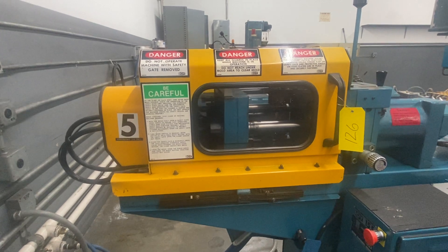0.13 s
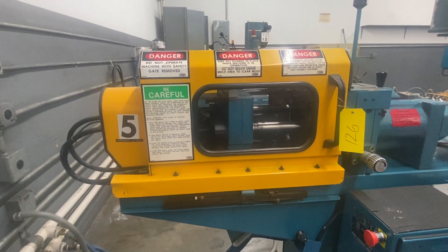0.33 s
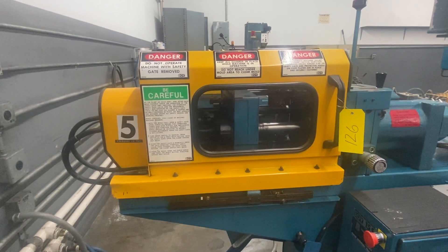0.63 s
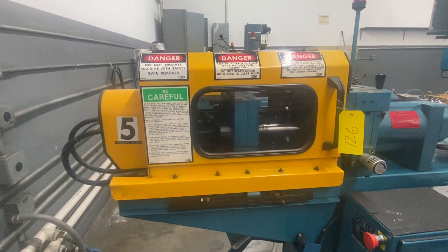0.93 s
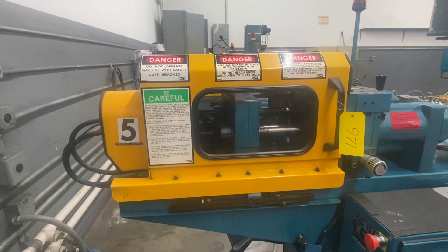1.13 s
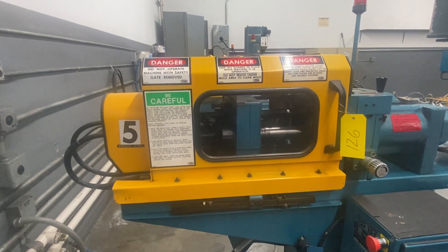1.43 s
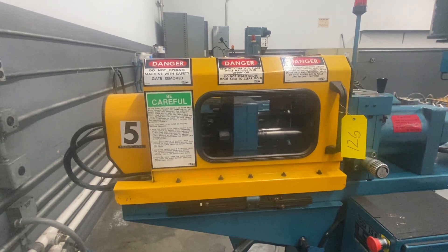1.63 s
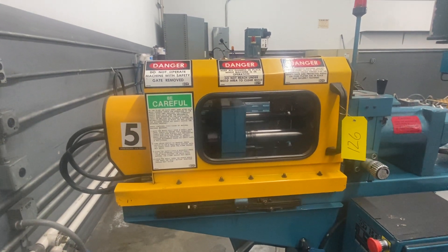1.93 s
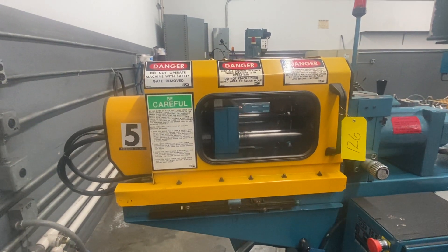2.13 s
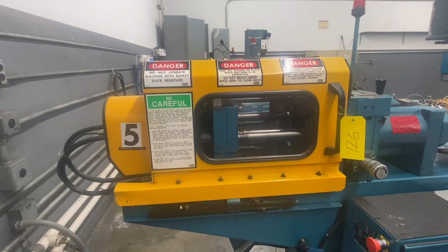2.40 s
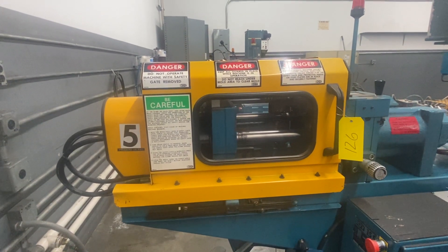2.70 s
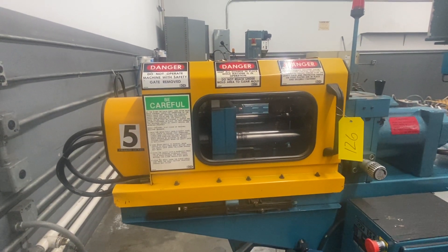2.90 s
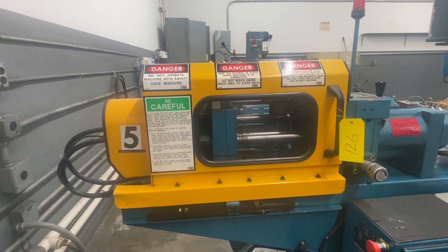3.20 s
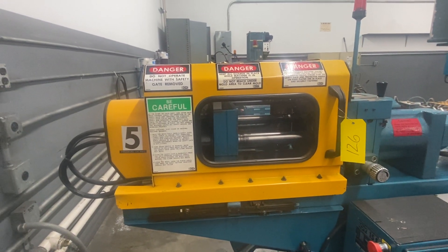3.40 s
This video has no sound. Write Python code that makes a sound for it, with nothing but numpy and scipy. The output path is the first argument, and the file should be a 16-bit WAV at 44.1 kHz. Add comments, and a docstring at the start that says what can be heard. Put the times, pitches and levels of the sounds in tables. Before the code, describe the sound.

A moulding machine's hydraulic pump whines close by in a workshop, over motor hum and rushing oil. Near 0.8 seconds a soft valve hiss and thud change the whine's tone. At 1.6 seconds a louder hiss and the hardest thuds hit the steel frame; the pump slows slightly and a thin whistle joins. At 2.2 seconds another hiss and thud end the whistle, and the pump recovers, running steadily.

```python
"""A moulding machine in a workshop, heard close up through two microphone ports. At first its
eleven-piston hydraulic pump idles, whining over motor and fan hum and a rush of oil. Valves switch three
times, each with a short hiss and thuds in the steel frame. Near 0.8 s the whine changes colour; near
1.6 s the hardest thud lands, the pump slows under load and a thin whistle joins in; near 2.2 s the
whistle stops and the pump recovers its speed."""
import sys
import numpy as np
from scipy import signal
from scipy.fft import rfft, irfft, next_fast_len
from scipy.io import wavfile
from scipy.ndimage import uniform_filter1d

SR = 44100
rng = np.random.default_rng(int(sys.argv[2]) if len(sys.argv) > 2 else 0)


def output_pcm(signal):
    """Save a mono or channel-first signal as 16-bit PCM at the path in sys.argv[1].

    Samples are clipped to [-1, 1] before scaling.
    """
    pcm = np.clip(np.atleast_2d(signal).T, -1, 1) * 32767
    wavfile.write(sys.argv[1], SR, np.round(pcm).astype(np.int16))


N = 156555
STEP = 128  # samples between values of a slow control curve
TIME = np.arange(N) / SR
CONTROL_TIME = TIME[::STEP]


def amp(db):
    return 10 ** (np.asarray(db) / 20)


def unit_rms(x):
    return x / np.sqrt(np.mean(x ** 2) + 1e-20)


def curve(points, x):
    return np.interp(x, *np.transpose(points))


def log_curve(points, hz):
    point_hz, value = np.transpose(points)
    return np.interp(np.log(hz + 1), np.log(point_hz + 1), value)


def per_sample(control):
    return np.interp(TIME, CONTROL_TIME, control)


def wander(top_hz, count):
    """Random control curves of rms 1, each a sum of slow sines up to about top_hz."""
    hz = np.geomspace(.3, top_hz, 24)[:, None]
    chance = rng.random((count, 24, 2))
    detune = .8 + .409 * chance[..., 1:]
    waves = np.sin(2 * np.pi * (hz * detune * CONTROL_TIME + chance[..., :1])) / hz ** .1
    return np.array([unit_rms(row) for row in waves.sum(1)])


def tone(angle, left_rms, right_rms, lead):
    """One tone at both ports, the left ahead by lead radians."""
    lead = per_sample(np.broadcast_to(lead, CONTROL_TIME.shape))
    left = per_sample(left_rms) * np.cos(angle + lead)
    right = per_sample(right_rms) * np.cos(angle)
    return np.sqrt(2) * np.array([left, right])


# How alike the two ports sound. Each row: frequency in Hz, likeness from 0 to 1.
PORT_LIKENESS = [(40, 1), (110, 0.79), (200, 0.97), (280, 0.35), (450, 0.083), (1500, 0.29), (3000, 0.05),
                 (6000, 0.16), (10200, 0.13), (11000, 0.75), (15500, 0.8)]
# Phase between the ports. Each row: frequency in Hz, left lead in radians.
PORT_LEAD = [(0, 0), (300, -.3), (1100, -2.6), (1800, -3), (3000, -4.7), (4000, -6.7), (5700, -9.4),
             (6700, -12.6), (9000, -15.5), (11600, -18.85), (12900, -22), (13700, -22), (14900, -25.13),
             (16000, -25.13)]
# Balance of noise at the microphone. Each row: frequency in Hz, left over right in dB.
PORT_BALANCE = [(60, 5), (150, -1), (400, .5), (1500, 1.5), (3000, 7), (5500, 2), (7700, -0.5), (9300, -14),
                (11000, -0.5), (15000, 0)]

def port_noise(spectrum, patchy_db, flicker_db):
    """Coloured noise of rms 1 at both ports, with drifting patches and flickering bands."""
    frames, hz = N // 256 + 5, np.fft.rfftfreq(1024, 1 / SR)
    a, b, c, d, chance = rng.standard_normal((frames, 513, 5)).T
    right, unshared = a + 1j * b, c + 1j * d
    flicker = unit_rms(uniform_filter1d(chance, 200, 0))
    patches = unit_rms(uniform_filter1d(uniform_filter1d(chance, 12, 0), 12, 1))
    likeness = np.clip(log_curve(PORT_LIKENESS, hz), 0, 1)[:, None]
    left = likeness * right + np.sqrt(1 - likeness ** 2) * unshared
    left *= np.exp(1j * curve(PORT_LEAD, hz))[:, None]
    lean = amp(log_curve(PORT_BALANCE, hz) / 2)[:, None]
    octaves_below = np.log2(np.maximum(spectrum[0][0] / (hz + 1), 1))
    colour_db = log_curve(spectrum, hz) - 30 * octaves_below
    gain = amp(colour_db[:, None] + patchy_db * patches + flicker_db * flicker)
    ports = np.array([left * lean, right / lean]) * gain
    return unit_rms(signal.istft(ports, nperseg=1024, noverlap=768)[1][:, :N])


# The rush around the machine. Each row: frequency in Hz, relative density in dB.
ROAR_SPECTRUM = [(42, 0), (56, -4), (90, -8.5), (200, -4), (420, -7.5), (750, -8), (1500, -10.5),
                 (3000, -21), (4800, -25), (6800, -18.5), (9500, -26.5), (12000, -33), (15500, -31)]
# Its swell under load. Each row: time in seconds, level change in dB.
ROAR_SWELL = [(0, 0), (.75, 0.5), (1, -0.5), (1.6, 1.5), (1.9, 3), (2.15, 2.5), (2.45, 1.5), (3, -0.5),
              (3.55, 0)]

def roar():
    """Broad rush of oil, fans and workshop, behind everything else."""
    level = amp(-33 + curve(ROAR_SWELL, TIME))
    return level * port_noise(ROAR_SPECTRUM, patchy_db=1.25, flicker_db=1)


# Motors and fans at the microphone. Each row: frequency in Hz, level in dB, wavering in dB,
# left over right in dB, left lead in radians.
HUM_TONES = [(80.2, -41.5, 3, -3.5, 0.078), (122.2, -46.5, 2.5, -1, 0.32), (162.7, -45, 1, -2, 0.55),
             (239.2, -53.5, 3.5, 2, 0.46), (358.3, -51, -3, -18.5, 0.17), (538, -39.5, 0.5, 7.5, 0.27),
             (568.4, -58.5, -9.5, -7, .6), (820, -56, 5, 15, 4.5), (884, -47.5, 4, 2, 1.9),
             (2692, -69, 9, -3, .5)]

def hums():
    """Steady tones of motors and fans, each wavering a little in level and phase."""
    count, out = len(HUM_TONES), np.zeros((2, N))
    phases = 2 * np.pi * rng.random(count)
    wavers, drifts = wander(12, count), wander(8, count)
    for (hz, db, waver_db, lean_db, lead), waver, drift, phase in zip(HUM_TONES, wavers, drifts, phases):
        angle = 2 * np.pi * hz * TIME + phase + per_sample(.098 * waver_db * drift)
        level_db = db + waver_db * waver
        out += tone(angle, amp(level_db + lean_db / 2), amp(level_db - lean_db / 2), lead)
    return out


def load_whistle(hz=2158, db=-45.5, start_s=1.72, end_s=2.22):
    """A thin, wavering tone, timed to the stretch where the pump is loaded."""
    fade = np.clip(np.minimum(CONTROL_TIME - start_s, end_s - CONTROL_TIME) / .019, 0, 1)
    level = amp(db + 3.7 * wander(16, count=1)[0]) * fade
    return tone(2 * np.pi * hz * TIME, level, level, lead=1.1)


# The valves, close by. Each row: start, rise, hold and 60 dB decay time in seconds, level in dB.
VALVE_HISSES = [(0.776, 0.02, .05, 0.94, -41), (1.62, .002, .01, .08, -30),
                (1.635, 0.024, 0.084, 0.43, -29), (1.775, 0.0092, 0.11, 1.1, -40.5),
                (2.196, .003, 0.006, 0.095, -29), (2.199, 0.0091, 0.015, 1.3, -31.5)]
# The colour they share. Each row: frequency in Hz, relative density in dB.
HISS_SPECTRUM = [(1600, 0), (3000, -2.5), (4000, -3), (6500, 3), (8500, -3.5), (11000, -4), (13000, -8.5),
                 (15500, -9)]

def valve_hisses():
    """Air and oil rush through a valve: rise, hold, release."""
    power = np.zeros(N)
    for start, rise, hold, t60, db in VALVE_HISSES:
        opening = np.clip((TIME - start) / rise, 0, 1)
        released_s = np.maximum(TIME - start - rise - hold, 0)
        power += (opening * amp(db - 60 * released_s / t60)) ** 2
    return np.sqrt(power) * port_noise(HISS_SPECTRUM, patchy_db=2.5, flicker_db=.68)


def workshop_room(sound, tail_db=-6, t60=.6):
    """A sound reaches the ports apart in phase, with the room's tail following 6 ms behind."""
    t, size = TIME[:SR // 2], len(sound)
    hz = np.fft.rfftfreq(size, 1 / SR)
    tails = rng.standard_normal((2, len(t))) * amp(-60 * t / t60) * (t > .006)
    right_tail, unshared = rfft(tails / np.linalg.norm(tails[0]), size) * amp(tail_db)
    likeness = np.clip(log_curve(PORT_LIKENESS, hz), 0, 1)
    left_tail = likeness * right_tail + np.sqrt(1 - likeness ** 2) * unshared
    lead = np.exp(1j * curve(PORT_LEAD, hz))
    paths = np.array([lead * (1 + left_tail), 1 + right_tail])
    return irfft(rfft(sound) * paths, size)[:, :N]


# Shocks in the frame. Each row: start in seconds, gain in dB, pitch factor, tilt in dB per octave.
SHOCKS = [(.74, -33, 1.1, -2), (1.650, -19, 1.0, 0), (1.684, -26, .8, -3), (1.706, -25, .95, -1),
          (1.745, -29, 1.1, -1), (2.203, -32, 1.0, 3), (2.262, -29, .8, -2)]
# The frame's modes. Each row: frequency in Hz, relative level in dB, 60 dB decay time in seconds.
FRAME_MODES = [(62, -9, .35), (110, -6, .3), (160, -3, .3), (240, -6, .18), (340, 2, .1), (430, -2, .09),
               (530, -2, .08), (640, -1, .08), (800, -6, .07), (960, -7, .07), (1200, -11, .05),
               (1500, -9, .05), (1800, -11, .045), (2200, -13, .04)]

def frame_thuds(rise_s=.005, clatter_share=.4, clatter_s=.012):
    """Pressure shocks, each with loose after-blows, set the steel frame ringing into the room."""
    t, frame = TIME[:SR // 2], np.zeros(next_fast_len(N + SR, True))
    clatter_decay = np.exp(-t / clatter_s)
    for start, db, pitch, tilt_db in SHOCKS:
        blow = clatter_share * rng.standard_normal(len(t)) * clatter_decay / np.linalg.norm(clatter_decay)
        blow[0] = 1  # the shock itself
        ring = np.zeros(len(t))
        for hz, mode_db, t60 in FRAME_MODES:
            level = amp(mode_db + tilt_db * np.log2(hz / 340) - 60 * t / t60)
            ring += level * np.sin(2 * np.pi * (hz * pitch * t + rng.random()))
        ring *= np.minimum(t / rise_s, 1)
        frame[round(start * SR):][:len(t)] += amp(db) * signal.fftconvolve(blow, ring)[:len(t)]
    return workshop_room(frame)


# The work cycle. Each row: time in seconds, stage from 0 (idling) to 3 (recovered), unsteadiness 0 to 1.
PUMP_CYCLE = [(0, 0, .2), (.78, 0, .2), (.82, .6, .4), (1.0, 1, .2), (1.64, 1, .2), (1.67, 1.7, 1),
              (1.8, 1.8, .7), (1.92, 1.9, .7), (1.97, 2, .2), (2.2, 2, .2), (2.23, 2.4, 1),
              (2.36, 2.6, .65), (2.48, 2.75, .4), (2.57, 3, .2), (3.55, 3, .2)]
# The pump's pace, sagging under load. Each row: time in seconds, piston strokes per second.
STROKE_RATE = [(0, 326.6), (.76, 326.6), (.9, 327.25), (1.64, 327.3), (1.69, 317.5), (1.8, 323),
               (1.88, 320), (1.96, 321.3), (2.2, 321.1), (2.29, 329.5), (2.34, 326), (2.41, 328),
               (2.47, 327.1), (3.55, 327.3)]
# The whine close up, a table for each port. Each row: one harmonic's level in dB at stages 0 to 3.
WHINE_LEFT_DB = [(-30.5, -34, -36.5, -31.5), (-41.5, -48, -30, -55.5), (-29, -37, -40.5, -39),
                 (-52, -39.5, -41, -43), (-42.5, -53, -54, -42), (-41.5, -44.5, -38.5, -44.5),
                 (-46.5, -49.5, -38, -52), (-47.5, -56, -59, -53), (-43, -45.5, -38.5, -43),
                 (-60, -54, -52, -76), (-67, -58, -60, -56), (-66, -48, -50, -51.5), (-50, -57, -56, -45.5),
                 (-61, -66, -50, -66), (-46, -51, -52, -49), (-42, -38, -39.5, -40), (-62, -51, -48, -51),
                 (-54, -51, -67, -56), (-49, -53, -51, -55), (-54, -50.5, -75, -40), (-51, -57, -51, -57),
                 (-48.5, -51, -65, -46), (-58, -59, -63, -58), (-53, -48.5, -65, -53),
                 (-60, -53, -62, -49.5), (-59, -49, -69, -61), (-56, -62, -64, -53), (-64, -64, -43, -65),
                 (-65, -120, -72, -51), (-54.5, -54, -67, -54.5), (-73, -70, -71, -61),
                 (-63, -58, -69, -72), (-53, -72, -67, -62), (-73, -71, -74, -71), (-74, -76, -54, -64),
                 (-69, -85, -62, -59), (-69, -84, -64, -71), (-74, -77, -60, -75), (-72, -73, -56, -64),
                 (-74, -65, -77, -66), (-70, -73, -66, -59), (-70, -78, -93, -83)]
WHINE_RIGHT_DB = [(-26.5, -29.5, -32, -31), (-32.5, -32.5, -30.5, -35), (-28, -33.5, -35, -33),
                  (-43.5, -44, -36.5, -65), (-40, -47, -42, -37.5), (-37.5, -38.5, -36, -38.5),
                  (-43.5, -45, -38, -45.5), (-45.5, -48.5, -46, -48.5), (-43, -47, -40.5, -44.5),
                  (-59, -46, -45, -54.5), (-56, -51, -64, -51.5), (-67, -55, -58, -80),
                  (-52.5, -60, -65, -63), (-56, -52, -54, -58), (-56, -48, -63, -51),
                  (-42, -43.5, -46, -47), (-58, -56, -51, -57), (-51, -72, -61, -67),
                  (-51.5, -54, -49, -55), (-50, -47, -65, -39.5), (-54, -61, -63, -53),
                  (-51, -58, -59, -50), (-54, -55, -58, -59), (-55, -62, -66, -49), (-49, -49, -62, -47),
                  (-55, -53, -69, -54), (-58, -54, -58, -49), (-53, -61, -45, -53), (-62, -78, -55, -59),
                  (-57, -60, -70, -56), (-64, -64, -61, -56), (-66, -69, -43, -69), (-78, -73, -63, -64),
                  (-73, -76, -76, -68), (-74, -77, -64, -58), (-66, -85, -65, -66), (-68, -84, -75, -72),
                  (-76, -103, -66, -75), (-67, -70, -52, -78), (-76, -78, -76, -66), (-70, -73, -66, -58),
                  (-70, -79, -76, -76)]
# Its phase between the ports. Each row: one harmonic's left lead in radians at stages 0 to 3.
WHINE_LEAD = [(0.1, 0.6, -0.8, 0.5), (1.1, 0.2, -2.6, -2.5), (-3.1, -2.3, -2.6, -1.7),
              (-0.6, -1.1, -3.0, -2.4), (1.8, 3.0, 0.8, 2.8), (-1.9, -1.6, -0.3, -2.2),
              (-0.3, 0.1, -1.1, 0.1), (1.7, 0.3, -2.7, 0.3), (0.8, 1.2, 2.7, 0.7), (1.0, 1.3, -0.4, 1.1),
              (0.7, -0.4, -1.0, -0.4), (-2.3, 0.3, 2.4, 2.5), (-1.1, -3.1, 1.2, -2.2), (1.7, 0.2, 0.5, 0.4),
              (-2.1, -2.3, -1.9, -1.7), (3.0, -3.0, -2.7, -1.9), (-2.9, -2.4, 0.2, 0.1),
              (-2.0, 3.1, -1.7, 2.6), (-1.7, 0.0, 1.0, 0.2), (-1.7, 0.3, -0.4, -0.3), (0.3, -0.5, 1.4, 0.9),
              (-0.7, 2.3, 2.2, -2.4), (-3.0, 2.6, 0.4, 0.7), (2.9, 1.6, 2.2, -1.5), (-2.4, -2.8, 1.6, 3.1),
              (-0.6, -2.5, -0.8, -0.2), (1.7, -1.3, -0.0, -1.7), (-1.7, 2.2, -2.5, -2.4),
              (-2.4, 2.9, -2.7, -3.0), (1.3, 2.6, 1.8, 2.9), (1.5, -0.8, 2.3, 0.8), (0.7, -0.1, -1.1, 0.0),
              (-0.6, -0.1, 0.1, -0.1), (-0.0, 0.0, 0.0, 0.0), (-0.0, -0.0, -0.0, 0.0),
              (-0.2, -0.0, 0.0, -0.7), (-0.7, -1.8, -1.6, -0.7), (-2.8, -2.3, -1.3, -3.1),
              (-3.0, -2.9, -2.1, 3.1), (-3.1, 3.1, -3.1, -3.1), (3.1, -3.1, -3.1, 3.1),
              (3.1, -3.1, -3.1, 3.1)]
# Pressure surges make one harmonic flare or drop out.
# Each row: start and length in seconds, harmonic number, peak change in dB.
PRESSURE_SURGES = [(.83, .05, 3, 6), (.78, .09, 20, 10), (1.7, .07, 2, 9), (1.74, .1, 7, 7),
                   (1.78, .08, 1, -12), (1.81, .06, 2, 11), (1.87, .1, 6, -12), (1.87, .09, 7, -12),
                   (1.87, .1, 2, -8), (1.85, .11, 3, 10), (2.0, .07, 3, 9), (2.195, .035, 6, 7),
                   (2.22, .05, 3, 17), (2.27, .05, 6, 8), (2.315, .04, 3, 11), (2.34, .05, 5, 7)]

def pump(pistons=11, waver_db=4, scatter_rad=.2, sink_db=-.9):
    """Harmonics of the piston rate change by stage, and waver, scatter and sink when pressure swings."""
    t, count, out = CONTROL_TIME, len(WHINE_LEFT_DB), np.zeros((2, N))
    times, *columns = np.transpose(PUMP_CYCLE)
    stage, unsteady = (np.interp(t, times, column) for column in columns)
    stroke_angle = 2 * np.pi * np.cumsum(curve(STROKE_RATE, TIME)) / SR
    shaft_angle = stroke_angle[::STEP] / pistons
    phases = 2 * np.pi * rng.random((count, 2))
    wavers = wander(14, 3 * count).reshape(3, count, -1)  # shared, left, right
    scatters = wander(30, count)
    for i, (phase, wobble_phase) in enumerate(phases):
        harmonic = i + 1
        change_db = unsteady * waver_db * (wavers[0, i] + .51 * wavers[1:, i])
        change_db += sink_db * harmonic * (unsteady - unsteady.min())
        for start, length, number, peak_db in PRESSURE_SURGES:
            if number == harmonic:
                change_db += peak_db * np.sin(np.pi * np.clip((t - start) / length, 0, 1))
        wobble = 1 + .2 * np.cos(shaft_angle + wobble_phase)  # once a turn
        left = wobble * amp(np.interp(stage, range(4), WHINE_LEFT_DB[i]) + change_db[0])
        right = wobble * amp(np.interp(stage, range(4), WHINE_RIGHT_DB[i]) + change_db[1])
        lead = np.interp(stage, range(4), np.unwrap(WHINE_LEAD[i]))
        scatter = per_sample(scatter_rad * harmonic * unsteady ** 2 * scatters[i])
        out += tone(harmonic * stroke_angle + phase + scatter, left, right, lead)
    return out


def scene():
    """The whole machine, from where the microphone stands."""
    return pump() + hums() + load_whistle() + roar() + valve_hisses() + frame_thuds()


def record(dry):
    """The microphone's bass cut, then the band limit."""
    bass_cut = signal.butter(4, 49.4, "high", fs=SR, output="sos")
    band_limit = signal.firwin(511, 15780, window=("kaiser", 9), fs=SR)
    return signal.oaconvolve(signal.sosfilt(bass_cut, dry), band_limit[None], "same")


dry = scene()
out = record(dry)
output_pcm(out)
```